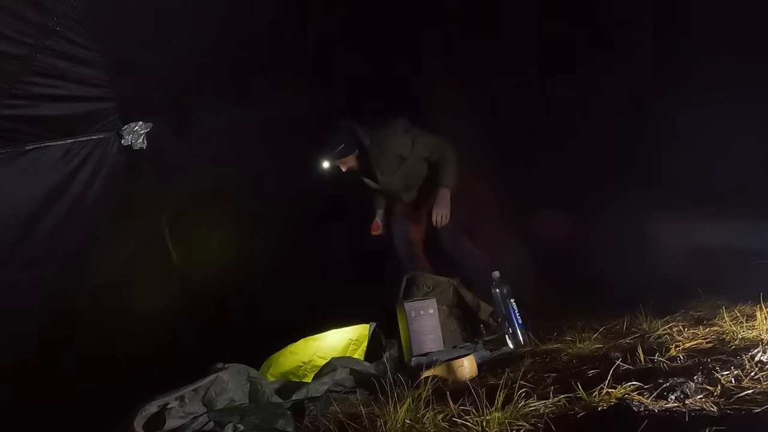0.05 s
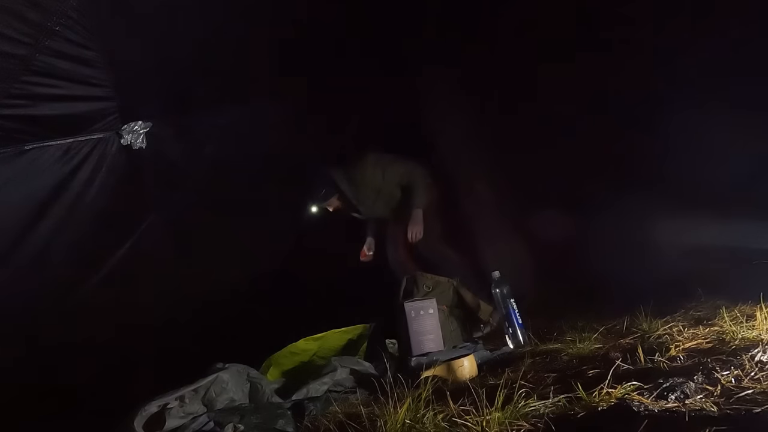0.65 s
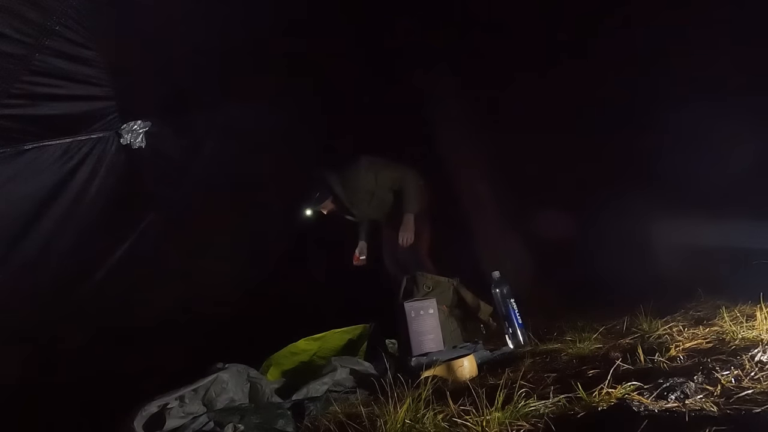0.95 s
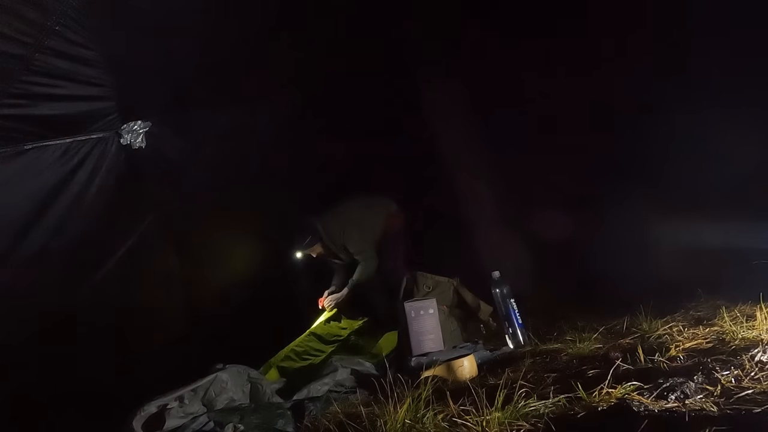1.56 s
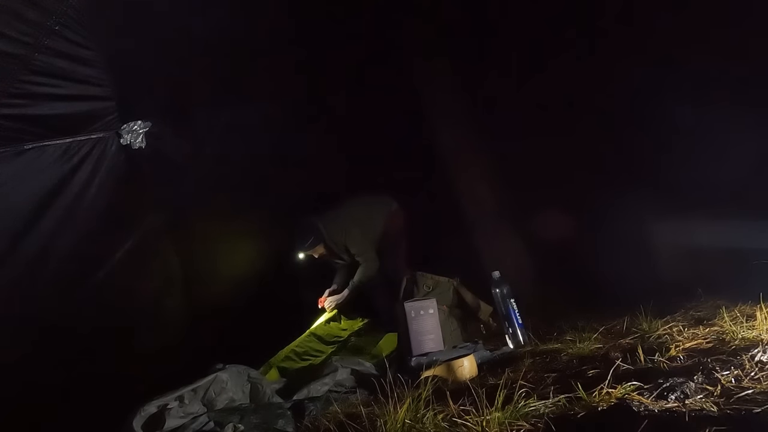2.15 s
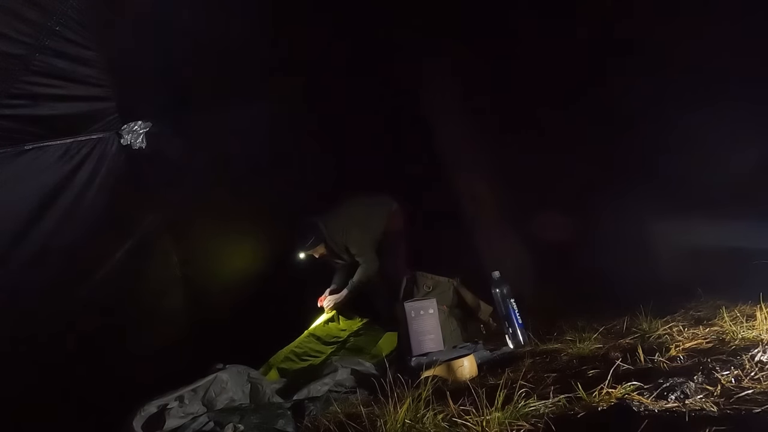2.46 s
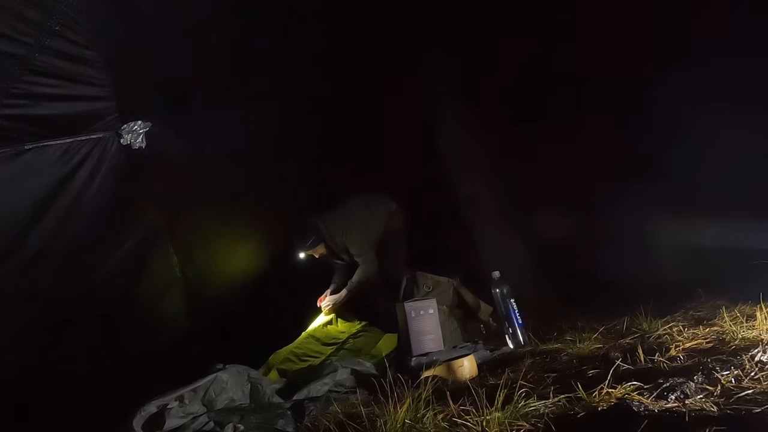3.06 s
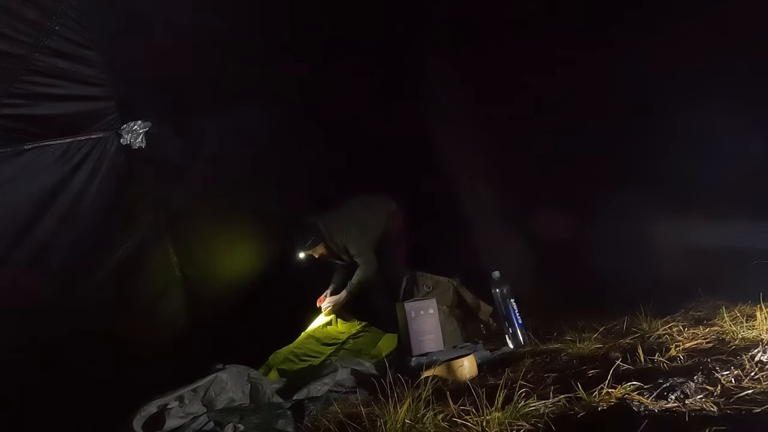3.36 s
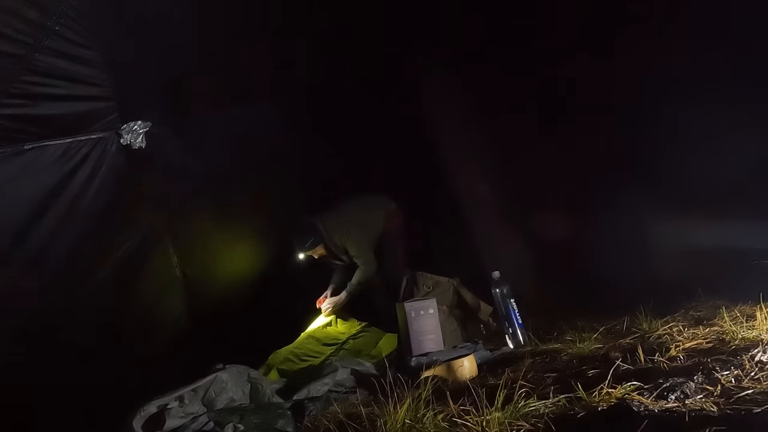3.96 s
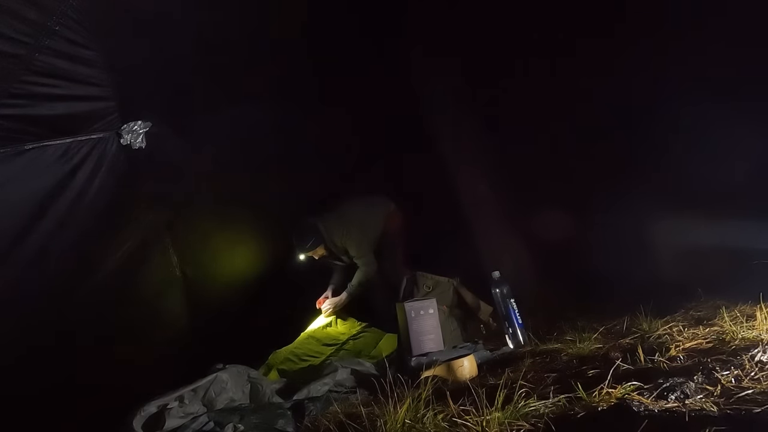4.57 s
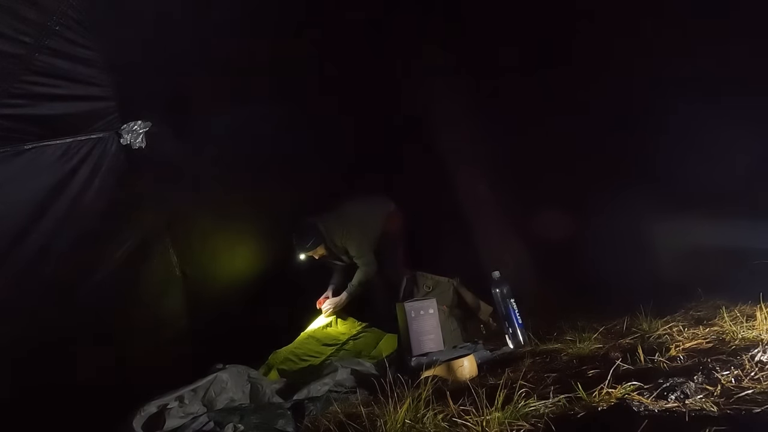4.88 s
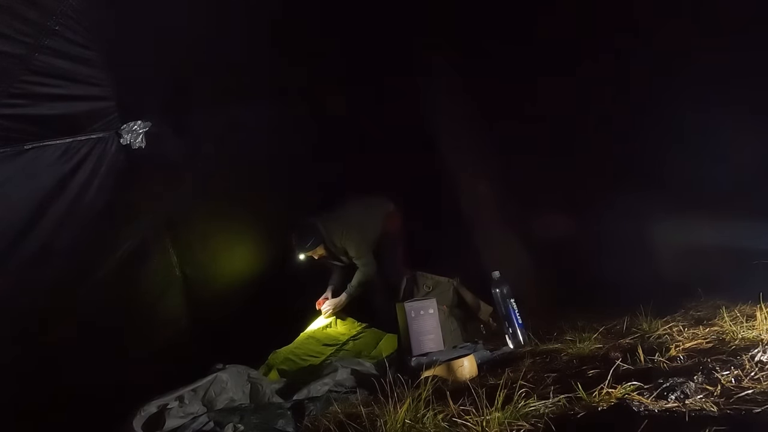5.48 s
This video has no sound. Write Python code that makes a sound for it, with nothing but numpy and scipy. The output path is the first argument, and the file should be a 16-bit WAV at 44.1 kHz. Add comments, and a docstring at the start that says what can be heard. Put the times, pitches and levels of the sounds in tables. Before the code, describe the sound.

Under a tarp at night, someone takes two soft, thudding steps, bumping gear and faintly rustling nylon. A tiny electric pump then spins up, sags briefly as air hisses out at the nozzle, and settles into a steady whine over rushing air. Its whistle slowly fades as the sleeping pad fills. Occasional drip-like taps strike the taut tarp throughout. The sound is fairly dry and centred.

```python
"""Under a tarp at night: someone steps over soft ground, bumps and rustles nylon gear, and switches on
a tiny electric pump on a sleeping pad. Its eight-bladed fan spins up, labours for a moment as air
escapes at the nozzle, then settles to a whine over rushing air; the whistle fades as the pad fills.
Now and then something like a drip taps the taut tarp and sets it ringing."""
import sys
import numpy as np
from scipy import signal
from scipy.fft import rfft, irfft
from scipy.io import wavfile

SR = 44100
rng = np.random.default_rng(int(sys.argv[2]) if len(sys.argv) > 2 else 0)


def dump_mix(stems):
    """Bounce the given channels to the path in sys.argv[1] as a 16-bit WAV at rate SR."""
    frames = np.atleast_2d(stems).T  # one column per channel
    limited = np.clip(frames, -1, 1)  # hard clip at full scale
    pcm = np.round(limited * 32767).astype(np.int16)
    wavfile.write(sys.argv[1], SR, pcm)


N = 243431
TIME = np.arange(N) / SR
FREQS = np.maximum(np.fft.rfftfreq(N, 1 / SR), 1)


def undb(db):
    """Decibels to gain."""
    return 10 ** (np.asarray(db) / 20)


def unit(x):
    """Scale to rms 1."""
    return x / np.std(x)


def colour(x, spectrum, resonances=()):
    """EQ by a smooth spectrum plus bells, rolling off below the lowest point; rms 1."""
    hz, db = np.transpose(spectrum)
    smooth_db = np.interp(np.log(FREQS), np.log(hz), db) - 24 * np.maximum(np.log2(hz[0] / FREQS), 0)
    bells_db = sum(gain * 2 ** -(2 * (FREQS - centre) / width) ** 2 for centre, width, gain in resonances)
    return unit(irfft(rfft(x) * undb(smooth_db + bells_db), N))


def band(x, lo_hz, hi_hz, order=2):
    """Causal band-pass."""
    return signal.sosfilt(signal.butter(order, [lo_hz, hi_hz], "band", fs=SR, output="sos"), x)


def split(x, hz):
    """The parts of a sound below and above hz."""
    low = irfft(rfft(x) / (1 + (FREQS / hz) ** 16), N)
    return low, x - low


def walk(rate):
    """Smooth random drift, changing about rate times a second; rms 1."""
    return unit(irfft(rfft(rng.standard_normal(N)) * np.exp(-(FREQS / rate) ** 2), N))


def ramp(start_s, length_s):
    """Rise from 0 to 1, then hold."""
    return np.clip((TIME - start_s) / length_s, 0, 1)


def hump(s, rise_s, fall_s):
    """A rounded rise to 1 at time s and a fall back to 0."""
    return np.exp(-((TIME - s) / np.where(TIME < s, rise_s, fall_s)) ** 2)


def swell(t, peak_s):
    """Envelope of a soft contact: builds to 1 at peak_s, then dies away."""
    return (t / peak_s * np.exp(1 - t / peak_s)) ** 1.35


def decay(t, t60):
    """Die away by 60 dB in t60 seconds."""
    return np.exp(-np.log(1000) * t / t60)


def thud(hz, peak_s):
    """A soft contact that rings for only a few cycles."""
    t = np.arange(SR // 6) / SR
    return swell(t, peak_s) * np.sin(2 * np.pi * hz * t)


def add(track, s, sound):
    """Mix a sound into a track at time s."""
    start = max(int(s * SR), 0)
    track[start:start + len(sound)] += sound[:N - start]


# Tone of the night air. Each row: frequency in Hz, relative level in dB.
NIGHT_SPECTRUM = [(25, -0.5), (80, -20), (120, -12.5), (160, 8.5), (220, 1.5), (320, -10.5), (700, -26.5),
                  (1400, -13.5), (3000, -15.5), (6000, -46), (10000, -35), (15000, -53)]
def night(level_db=-60.5, sway_db=0.8):
    """A faint, low, far-off rush."""
    return colour(rng.standard_normal(N), NIGHT_SPECTRUM) * undb(level_db + sway_db * walk(17))


# Stray scuffs of nylon. Each row: start in seconds, peak in dB, swell time in seconds.
NYLON_SCUFFS = [(.0, -57, 0.026), (.317, -52.5, 0.009), (1.572, -53, 0.0075), (1.618, -58.5, 0.012)]
def scuff_envelope(contact_s=0.0072, tap_lead_s=0.01, under_tap_db=-23):
    """How loud the cloth scuffs are: on their own, and with every step, bump and tap."""
    soles = [(s + delay_s, db, contact_s) for s, *_, delay_s, db in FOOTFALLS]
    bumps = [(s, db, contact_s) for s, _, _, db in GEAR_BUMPS]
    # a faint, brief scuff of noise leads into each tap
    tarp = [(s - tap_lead_s, db + under_tap_db, tap_lead_s) for s, db, _, _ in TARP_TAPS]
    out, t = np.zeros(N), np.arange(SR // 8) / SR
    for s, db, peak_s in [*NYLON_SCUFFS, *soles, *bumps, *tarp]:
        add(out, s, undb(db) * swell(t, peak_s))
    return out


# Tone of rubbing nylon. Each row: frequency in Hz, relative level in dB.
NYLON_SPECTRUM = [(300, 3.5), (800, -5), (1400, 4.5), (2200, 1), (3200, 2), (5500, -3.5), (8500, -10.5),
                  (11500, -21.5), (15000, -27)]
# Clothing swishes. Each row: peak time in seconds, body in dB, sheen in dB.
STRIDE_SWISHES = [(0.621, -56, -60.5), (1.41, -59.5, -70)]
def rustle(stir_db=-64, crinkle_db=1.3, uneven_db=1.0, stir_sheen_db=-11, scuff_sheen_db=-15):
    """Folds slip in tiny uneven bursts: a constant stir, short scuffs and a swish with each stride."""
    folds = colour(rng.standard_normal(N) * undb(crinkle_db * walk(370)), NYLON_SPECTRUM)
    body, sheen = split(folds, 5630)
    sheen = unit(sheen)
    out = (body + undb(stir_sheen_db) * sheen) * undb(stir_db)
    out += (body + undb(scuff_sheen_db) * sheen) * scuff_envelope()
    for s, body_db, sheen_db in STRIDE_SWISHES:
        out += (undb(body_db) * body + undb(sheen_db) * sheen) * hump(s, rise_s=0.3, fall_s=0.19)
    return out * undb(uneven_db * walk(22))


def shelter(x, t60=0.19, wet_db=-19):
    """Tarp and ground throw back a short, dull scatter."""
    t = np.arange(SR // 4) / SR
    scatter = band(rng.standard_normal(len(t)), 67, 4100, order=1) * decay(t, t60) * (t > .004)
    return x + undb(wet_db) * signal.fftconvolve(x, scatter / np.linalg.norm(scatter))[:N]


# Steps on soft ground. Each row: start in seconds, heel peak in dB, pitch in Hz, swell time in seconds,
# ground boom in dB, delay of the sole's scuff in seconds, scuff in dB.
FOOTFALLS = [(.532, -25.5, 182, 0.0034, -31.5, .0005, -42), (1.356, -29, 135, 0.013, -35, 0.024, -48.5)]
def footsteps(ground_lag_s=0.011):
    """The heel thuds, then the earth gives under the weight with a low boom."""
    out = np.zeros(N)
    for s, heel_db, hz, peak_s, ground_db, _, _ in FOOTFALLS:
        add(out, s, undb(heel_db) * thud(hz, peak_s))
        add(out, s + ground_lag_s, undb(ground_db) * thud(hz=74, peak_s=0.0056))
    return out


# Dull bumps of gear. Each row: start in seconds, peak in dB, pitch in Hz, cloth scuff in dB.
GEAR_BUMPS = [(.064, -28, 202, -51), (1.043, -27, 294, -63), (1.29, -37, 245, -64),
              (1.344, -39.5, 330, -64), (1.937, -43, 290, -54), (2.425, -37, 330, -60),
              (2.497, -39, 265, -58), (2.994, -45.5, 284, -60)]
def gear(swell_cycles=0.85, overtone_ratio=2.34, overtone_db=-20, rebound_cycles=4.8, rebound_db=-6.5):
    """Soft gear bumps with a faint overtone and rebounds once; lower bumps take longer."""
    out = np.zeros(N)
    for s, db, hz, _ in GEAR_BUMPS:
        peak_s = swell_cycles / hz
        overtone = undb(overtone_db) * thud(hz * overtone_ratio, peak_s)
        add(out, s, undb(db) * (thud(hz, peak_s) + overtone))
        add(out, s + rebound_cycles / hz, undb(db + rebound_db) * thud(hz, peak_s * 0.66))
    return out


def cloth_ring(t, hz, t60, rise_cycles=0.32):
    """One struck mode; the soft cloth takes part of a cycle to get going."""
    return np.sin(2 * np.pi * hz * t) * (1 - np.exp(-t * hz / rise_cycles)) * decay(t, t60)


# Modes of the taut cloth. Each row: pitch in Hz, time to fall 60 dB in seconds, relative level in dB.
TARP_MODES = [(199, 0.029, -3.5), (570, 0.014, -1.5), (735, 0.025, -2.5), (866, 0.015, -0.5),
              (1410, 0.0034, 1.5), (1870, 0.0071, -2), (2630, 0.011, -9), (5040, 0.011, -20.5),
              (6650, 0.0064, -22.5)]
# Taps on the tarp, and at 0.72 s a soft, faint brush against it. Each row: start in seconds, level in dB,
# treble snap in dB, bass boom in dB.
TARP_TAPS = [(.064, -42.5, 19, -10), (0.72, -49.5, 16.5, -8), (0.8555, -26, 10.5, 4),
             (.914, -47.5, 15.5, -10), (1.5292, -25.5, 8.5, 3), (1.9183, -25, 1, -3.5),
             (2.8143, -18, -1, -16), (3.908, -16, -3, -1), (4.678, -38, -8, 10), (5.0677, -22, -6, -5)]
def tarp_taps(shiver_db=-18, shiver_t60=0.055):
    """Each tap rings the taut cloth briefly and leaves a shiver running through the sheet."""
    out, t = np.zeros(N), np.arange(SR // 8) / SR
    for s, db, snap_db, boom_db in TARP_TAPS:
        shiver = band(rng.standard_normal(len(t)), 970, 1800, order=1)
        shiver = unit(band(shiver, 300, 6200)) * decay(t, shiver_t60)
        tap = undb(snap_db + shiver_db) * shiver
        for k, (hz, t60, mode_db) in enumerate(TARP_MODES):
            # where and how hard it lands decides the share of low and high modes
            share_db = np.interp(hz, [200, 550, 900, 1500], [boom_db, 0, 0, snap_db])
            tap += (-1) ** k * undb(mode_db + share_db) * cloth_ring(t, hz, t60)
        add(out, s, undb(db) * tap)
    return out


# Nozzle hisses. Each row: peak time in seconds, half length in seconds, centre in Hz, width in Hz,
# level in dB.
NOZZLE_HISSES = [(2.242, 0.21, 3860, 220, -41), (2.414, 0.057, 6650, 400, -47),
                 (2.7, 0.25, 5800, 450, -45.5)]
def nozzle_hiss():
    """Air squeezes past the nozzle in narrow bands before it seals."""
    out = np.zeros(N)
    for s, half_s, hz, width_hz, db in NOZZLE_HISSES:
        hiss = unit(band(rng.standard_normal(N), hz - width_hz / 2, hz + width_hz / 2))
        out += hiss * undb(db) * hump(s, half_s, half_s)
    return out


# Tone of the turbulent air. Each row: frequency in Hz, relative level in dB.
AIR_SPECTRUM = [(150, -27.5), (400, -20.5), (700, -19), (1000, -6), (1400, 0.5), (2000, -5.5), (3000, -1.5),
                (4400, -6.5), (6200, -12), (8000, -15), (9700, -21), (11300, -30.5), (14000, -34),
                (15800, -41)]
# Resonances and notches of housing and nozzle. Each row: centre in Hz, width in Hz, gain in dB.
HOUSING_RESONANCES = [(928, 70, 8.5), (970, 76, -9), (1060, 36, -4.5), (1238, 120, 4), (1513, 154, 10.5),
                      (1685, 50, 0), (1847, 380, 5), (1960, 97, -0.5), (2530, 240, 2), (3196, 350, 3),
                      (3850, 100, 1), (5020, 220, 3), (5720, 120, 4), (5660, 145, 5.5), (5900, 145, 8),
                      (6770, 360, 4), (8380, 210, 5), (13100, 900, 4.5)]
# The air's hollow roar, rush and hiss. Each row: level in dB, loss at standstill in dB, lift from the
# leak in dB, gain in the spit in dB, change as the pad fills in dB per second.
AIR_LAYERS = [(-33.5, 11.5, 7.5, -3, -0.34), (-38, 15, 6.5, 5.5, 0.68), (-43.5, 13.5, 3, 7, 0.45)]
def air_rush(shortfall, leak, filling_s, flutter_db=0.27, spray_db=-66):
    """Turbulence rings the housing, louder with speed and with the leak; only the finest hiss is wide."""
    eddies = rng.standard_normal(N)
    # one high ring is damped until the nozzle touches the valve
    off_valve = colour(eddies, AIR_SPECTRUM, [*HOUSING_RESONANCES, (5700, 290, -2)])
    on_valve = colour(eddies, AIR_SPECTRUM, HOUSING_RESONANCES)
    touching = ramp(start_s=2.47, length_s=0.03)
    roar, upper = split(touching * on_valve + (1 - touching) * off_valve, 2400)
    rush, hiss = split(upper, 4410)
    spit = hump(2.003, rise_s=0.028, fall_s=0.028)  # the air starts with a short spit
    stream = np.zeros(N)
    for layer, (db, loss_db, leak_db, spit_db, fill_db_per_s) in zip([roar, rush, hiss], AIR_LAYERS):
        flow_db = leak_db * leak + spit_db * spit + fill_db_per_s * filling_s - loss_db * shortfall
        flow = undb(flow_db + flutter_db * walk(22))
        stream += unit(layer) * undb(db) * flow
    # a fine spray rides the flow of the last layer, the hiss; flipped on the right for width
    spray = unit(band(rng.standard_normal(N), 11600, 15400, order=3)) * undb(spray_db) * flow
    return stream + np.outer([1, -0.68], spray)


def shaft_tone(turns, order, flicker):
    """A tone at order cycles per shaft turn; eddies make it flicker in level and phase."""
    eddies = flicker * (walk(31) + 1j * walk(56))
    tone = np.real((1 + eddies) * np.exp(2j * np.pi * order * turns))
    return np.sqrt(2) * tone / np.sqrt(1 + 2 * flicker ** 2)


# Tones of the motor. Each row: multiple of shaft speed, relative level in dB.
MOTOR_TONES = [(1, -64.5), (3, -57.5), (5, -45), (6, -62), (7, -52), (10, -43), (11, -48.5), (12, -48.5),
               (13, -50.5), (14, -59), (21, -63), (27, -65.5), (34, -73)]
def motor_whine(turns, shortfall, trim_db=-1, standstill_loss_db=50, drift_db=0.2):
    """Tones locked to the shaft sink as it slows; each drifts in level, and higher ones are breathier."""
    out = np.zeros(N)
    for order, db in MOTOR_TONES:
        gain = undb(db + drift_db * walk(1.4))
        out += gain * shaft_tone(turns, order, flicker=0.43 * np.sqrt(order / 10))
    return out * undb(trim_db - standstill_loss_db * shortfall)


def fan_whistle(turns, shortfall, leak, seated, filling_s, blades=8, choke_db_per_s2=2.5):
    """The blades chop the air into a whistle; back pressure chokes it ever faster as the pad fills."""
    # below full speed the whistle is rougher and weaker, unless the leak lets the air run freely
    roughness = 0.1 + 6 * np.minimum(shortfall, 0.1) * (1 - 0.7 * leak)
    slow_loss_db = 39.5 * shortfall * (1 - leak)
    whistle_db = -40 + 11 * leak + 6.5 * seated - choke_db_per_s2 * filling_s ** 2 - slow_loss_db
    whistle = shaft_tone(turns, blades, roughness) * undb(whistle_db)
    # one chirp on the way up to speed
    chirp = shaft_tone(turns, blades, flicker=0.5) * undb(-36.5) * hump(2.014, rise_s=.013, fall_s=.032)
    overtones = shaft_tone(turns, 2 * blades, 3 * roughness) + .5 * shaft_tone(turns, 22, 3 * roughness)
    overtones *= undb(-71 + 24 * leak)
    # the third blade harmonic swells and fades
    shrill = shaft_tone(turns, 3 * blades, flicker=0.43) * undb(-56.5) * hump(4.56, rise_s=1, fall_s=1)
    return whistle + chirp + overtones + shrill


# Air escaping at the nozzle. Each row: time in seconds, opening from 0 to 1.
NOZZLE_LEAK = [(2.19, 0.04), (2.31, 0.35), (2.355, 0.99), (2.44, 1), (2.48, 0)]
def pump(on_s=1.931, full_hz=352.4, creep_hz_per_s=0.87, leak_drag_hz=62, inertia_s=0.1):
    """The shaft lags behind its drive: it spins up, is dragged down by the leak and recovers."""
    leak = np.interp(TIME, *np.transpose(NOZZLE_LEAK))
    drive_hz = (TIME > on_s) * (full_hz + creep_hz_per_s * (TIME - on_s) - leak_drag_hz * leak)
    lag = 1 / (inertia_s * SR)
    shaft_hz = signal.lfilter([lag], [1, lag - 1], drive_hz)
    shortfall = np.maximum(1 - shaft_hz / full_hz, 0)  # 1 at standstill, 0 at full speed
    wobble = (0.000576 + 0.02516 * shortfall) * walk(20.34)  # less even while slowed
    turns = np.cumsum(shaft_hz * (1 + wobble)) / SR
    seat_start_s, seat_length_s = 2.564, 0.34  # the nozzle settles on the valve
    seated = ramp(seat_start_s, seat_length_s)
    filling_s = np.maximum(TIME - seat_start_s - seat_length_s, 0)
    air = air_rush(shortfall, leak, filling_s) + nozzle_hiss()
    tones = fan_whistle(turns, shortfall, leak, seated, filling_s) + motor_whine(turns, shortfall)
    return ramp(start_s=1.956, length_s=0.0041) * (air + tones)


def scene():
    """All is centred except the pump's finest, highest hiss."""
    return pump() + shelter(tarp_taps() + footsteps() + gear()) + rustle() + night()


def record(dry, top_hz=15600):
    """A steep low-pass takes off the very top."""
    return signal.sosfilt(signal.ellip(10, .1, 80, top_hz, fs=SR, output="sos"), dry)


dry = scene()
out = record(dry)
dump_mix(out)
```